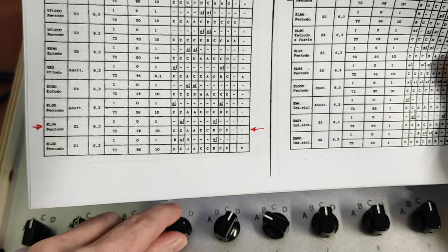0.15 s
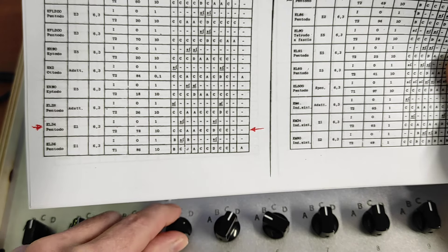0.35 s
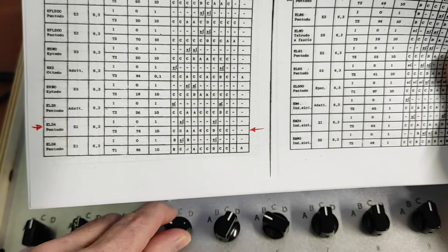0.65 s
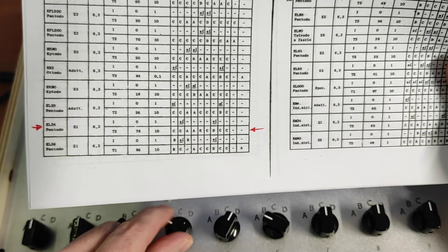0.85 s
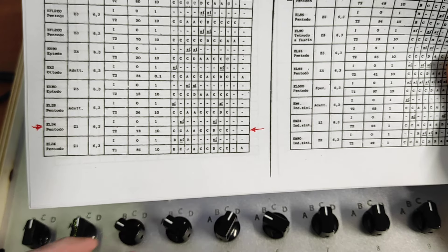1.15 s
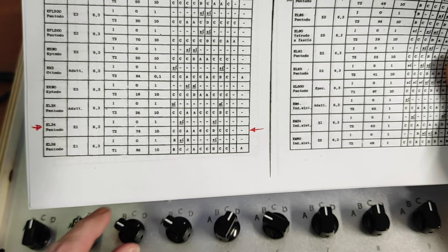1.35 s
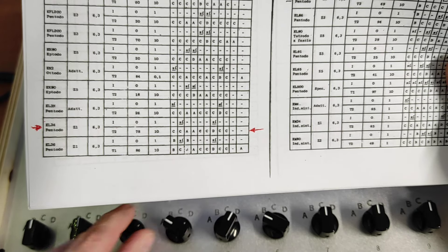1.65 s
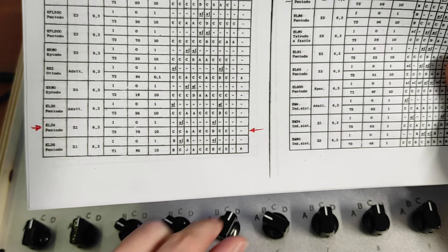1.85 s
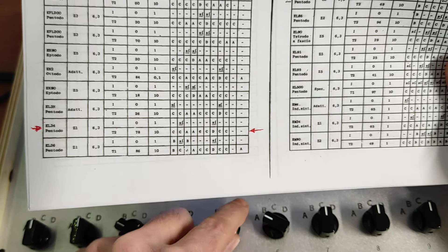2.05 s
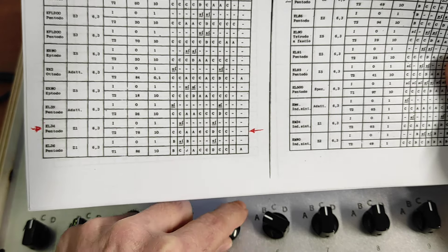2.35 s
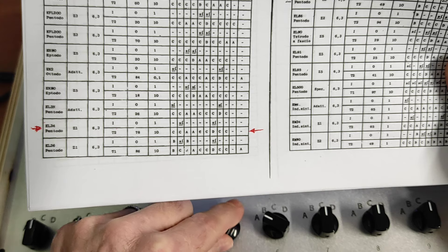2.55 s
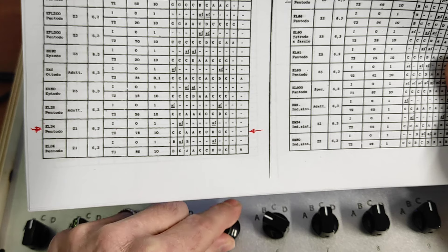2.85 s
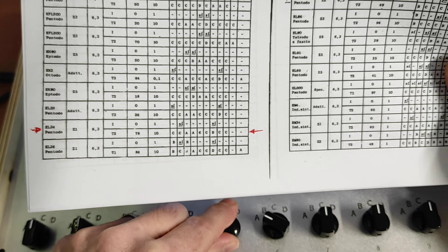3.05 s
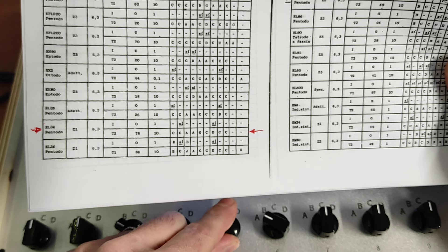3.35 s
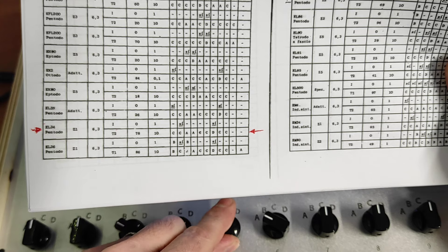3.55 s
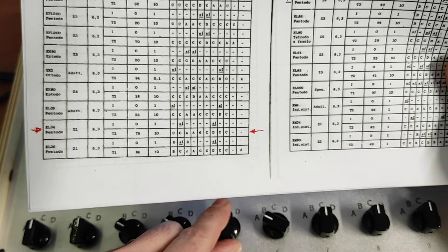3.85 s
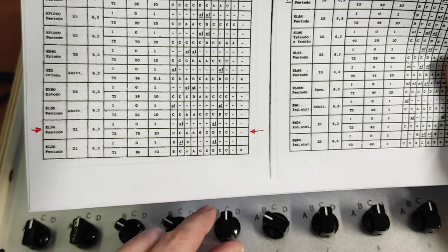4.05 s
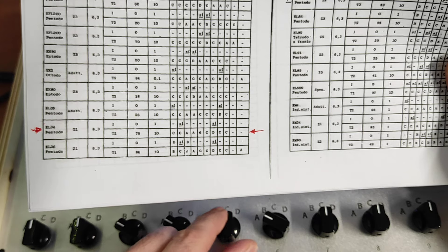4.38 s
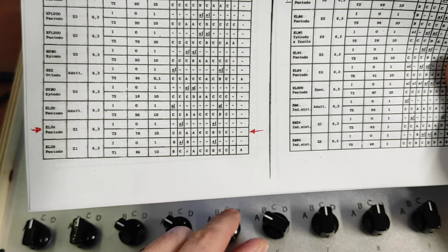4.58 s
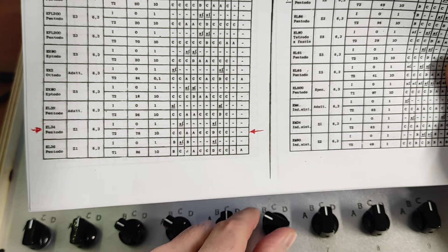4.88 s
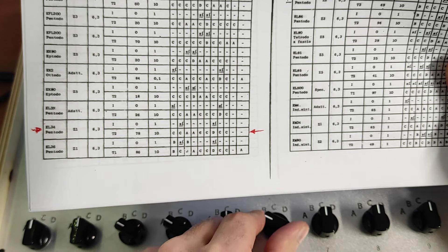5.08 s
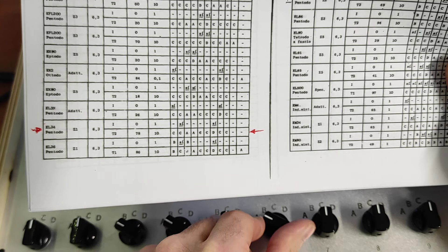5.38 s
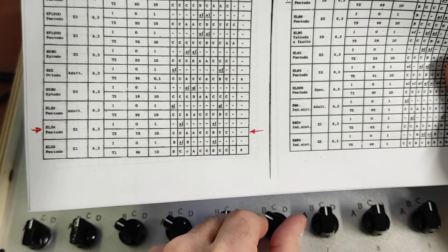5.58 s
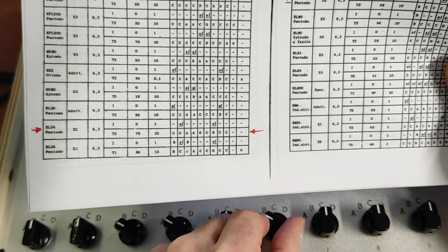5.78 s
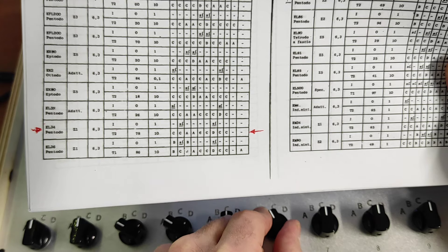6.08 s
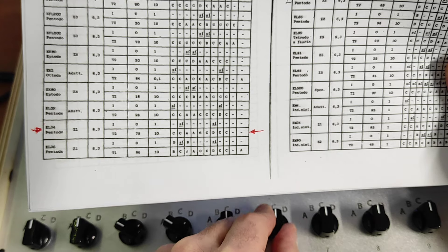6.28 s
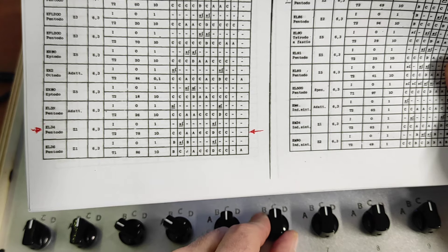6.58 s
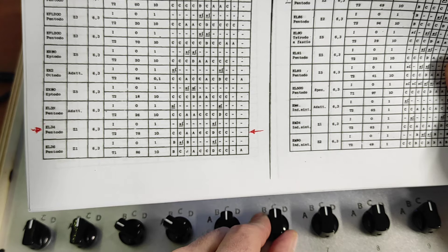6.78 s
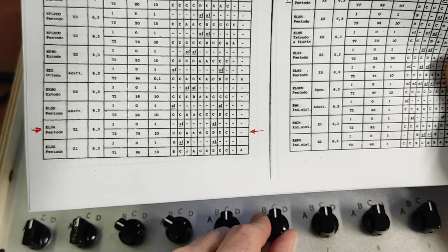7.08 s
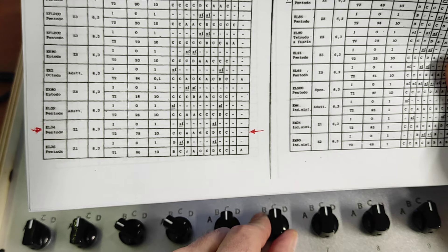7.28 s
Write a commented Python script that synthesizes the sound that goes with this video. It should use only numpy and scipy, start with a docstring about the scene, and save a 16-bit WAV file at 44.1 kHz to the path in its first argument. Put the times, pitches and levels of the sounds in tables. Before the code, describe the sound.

Close by, a hand turns rotary switches on a metal test device in a small quiet room. One bright, hard snap comes early, a much weaker rattly click midway, then two strong snaps near the end. Each has a tiny slip, spring rebounds, brief metallic ringing and a short room answer. Light fingertip taps fall between them. Distant traffic rumbles, with an engine drone swelling early and fading; faint hiss throughout.

```python
"""Far traffic rumbles and hisses behind a small quiet room, with one droning engine that swells early
and then draws away, all shaped from noise and slow gains, with a plain tone for the engine.
Close by, a hand turns rotary switches on a metal test set: each step slips, snaps and rattles in
bursts of noise, while decaying tones ring the spring and panel and the room answers.
Between the steps fingers tap the knobs lightly, as soft noise bursts; a faint hiss never stops."""
import sys
import numpy as np
from scipy import signal
from scipy.fft import rfft, irfft, next_fast_len
from scipy.io import wavfile
from scipy.ndimage import uniform_filter1d, minimum_filter1d, map_coordinates

SR = 44100
rng = np.random.default_rng(int(sys.argv[2]) if len(sys.argv) > 2 else 0)


def generate_wav(sig):
    """Save sig (samples, or channels by samples) to the path in sys.argv[1] as 16-bit PCM at SR."""
    pcm = np.round(np.clip(np.atleast_2d(sig).T, -1, 1) * 32767).astype(np.int16)
    wavfile.write(sys.argv[1], SR, pcm)


N = 327663
TOP_HZ = 15800  # the upper band limit

# Ways the front panel rings. Each row: pitch in Hz, relative level in dB, time to die by 60 dB in seconds.
PANEL = [(879, -4, 0.11), (1020, -1.5, 0.031), (1126, 5.5, .055), (1248, -3, 0.06)]
# The panel's strongest mode, which some steps drive far more than others. Each row: pitch in Hz,
# relative level in dB, time to die by 60 dB in seconds.
CENTRE_MODE = [(682, 1.5, 0.1)]


def amp(db):
    """Decibels to gain."""
    return 10 ** (np.asarray(db) / 20)


def unit(x):
    """x at rms 1."""
    return x / np.sqrt(np.mean(x ** 2) + 1e-20)


def along(points, hz):
    """(Hz, value) points read on a logarithmic frequency axis."""
    point_hz, value = np.transpose(points)
    return np.interp(np.log(hz + 1), np.log(point_hz + 1), value)


def wobble(rate, size=N):
    """A smooth random curve with this many random knots a second."""
    knots = rng.standard_normal(int(size * rate / SR) + 4)
    return map_coordinates(knots, [np.arange(size) * rate / SR])


def filtered(x, response):
    """x times a response of frequency, with spare silence so that the end does not wrap round."""
    n = x.shape[-1]
    m = next_fast_len(n + SR // 4)
    spectrum = rfft(x, m) * response(np.fft.rfftfreq(m, 1 / SR))
    return irfft(spectrum, m)[..., :n]


def sides(db):
    """Left and right gains for a left-minus-right level difference."""
    return amp(np.array([[.5], [-.5]]) * db)


def noise(spectrum, size):
    """Coloured stereo noise of rms 1, more alike on both sides in the bass than in the treble."""
    # Each row: frequency in Hz, likeness of left and right (1 is identical, 0 unrelated).
    alike = [(60, 0.54), (200, 1), (400, 0.4), (650, 0.28), (1200, 0.32), (2200, 0.11), (3000, 0.042)]

    def mid_and_side(hz):
        angle = np.arccos(np.clip(along(alike, hz), 0, 1)) / 2
        return amp(along(spectrum, hz)) * [np.cos(angle), np.sin(angle)]

    mid, side = filtered(rng.standard_normal((2, size)), mid_and_side)
    return unit(np.array([mid + side, mid - side]))


def fade(t, rise, t60):
    """A quick rise and an exponential decay from t = 0, both times in seconds."""
    t = np.maximum(t, 0)
    return (1 - np.exp(-t / rise)) * amp(-60 * t / t60)


def ring(modes, t, rise, scatter_db, phase_spread):
    """Damped tones, struck at new strengths and reaching each side in its own phase (radians)."""
    total = 0
    for hz, db, t60 in modes:
        strength = amp(db + scatter_db * rng.standard_normal())
        phase = phase_spread * rng.standard_normal((2, 1))
        total = total + strength * fade(t, rise, t60) * np.sin(2 * np.pi * hz * t + phase)
    return total


def add(track, s, sound):
    """Mix a sound into the track at time s, cut off at the track's end."""
    part = track[:, round(s * SR):][:, :sound.shape[1]]
    part += sound[:, :part.shape[1]]


def nearness(nearest_s, width_s):
    """Gain that swells and recedes as 1 / distance, as for a source going by on a straight line."""
    return 1 / np.hypot(1, (np.arange(N) / SR - nearest_s) / width_s)


def traffic():
    """Far traffic through the walls: swelling rumble, road noise and hiss, and one droning engine."""
    # Swells of low noise and hiss: vehicles going by, and at 3.5 s perhaps a finger rubbing.
    # Each row: time of the peak in seconds, swell on either side in seconds,
    # rumble in dB, road noise in dB, hiss in dB.
    swells = [(.45, 0.94, -61.5, -59.5, -69), (0.95, 0.09, -53.5, -57.5, -80.5),
              (1.15, 0.3, -58.5, -61, -73.5), (1.95, 0.19, -61.5, -75.5, -85), (2.9, .5, -66, -73, -72.5),
              (3.5, .15, -66, -67, -75), (4.45, 0.43, -70.5, -96, -73.5), (4.92, 0.25, -70.5, -62.5, -92),
              (5.33, 0.28, -77, -63.5, -86.5), (6.8, 0.99, -69, -69, -93.5)]
    # Colours of the three noises. Each row: frequency in Hz, relative level in dB per Hz.
    rumble_colour = [(15, -31), (26, -9), (35, 2.5), (42, -.5), (50, 2), (58, -11), (70, -14), (80, -20.5),
                     (105, -21), (190, -61)]
    road_colour = [(82, -29.5), (140, -0.5), (216, -3), (423, -13), (611, -13), (663, -11), (739, -16),
                   (950, -11.5), (1200, -19.5), (1560, -47), (2640, -120)]
    tyre_colour = [(500, -11.5), (850, 0), (1040, 5.5), (1250, 0.5), (1800, -0.5), (2600, -7.5),
                   (3400, -17), (5000, -22), (7500, -17.5), (9000, -24), (10500, -41.5), (15000, -47)]
    # Pitch of the drone. Each row: time in seconds, pitch in Hz.
    drone_pitch = [(0, 121.1), (.8, 121.7), (1.4, 125.2), (2, 129.9), (2.9, 134.2), (3.8, 134.3),
                   (4.7, 130)]
    # Balance of the traffic. Each row: frequency in Hz, left minus right in dB.
    lean = [(40, 2), (130, 6), (550, 4), (1650, 3), (5000, -3), (6500, -6), (8500, 1), (15000, 1)]
    far_rumble_db, far_road_db = -67.5, -73  # the traffic that is always there
    tyre_db, tyre_fade_db_per_s = -64, 2.5  # steady tyre hiss that draws away
    falloff = 1.8  # houses screen the road: the level falls as this power of distance
    engine_nearest_s, engine_width_s, engine_db = 0.52, 0.2, -55.5
    engine_start_s = 0.34  # the drone comes up from silence in this time
    hum_nearest_s, hum_width_s, hum_db = 2.6, 0.93, -71
    lead_s = .00043  # the left side hears the traffic this much earlier

    t = np.arange(N) / SR
    rumble_gain, road_gain = amp(far_rumble_db), amp(far_road_db)
    tyre_gain = amp(tyre_db - tyre_fade_db_per_s * t)
    for s, width_s, swell_rumble_db, swell_road_db, swell_hiss_db in swells:
        near = nearness(s, width_s) ** falloff
        # separate noises add by power
        rumble_gain = np.hypot(rumble_gain, amp(swell_rumble_db) * near)
        road_gain = np.hypot(road_gain, amp(swell_road_db) * near)
        tyre_gain = np.hypot(tyre_gain, amp(swell_hiss_db) * near)
    rumble = rumble_gain * amp(0.44 * wobble(12.0)) * noise(rumble_colour, N)
    road = road_gain * amp(1.4 * wobble(4.8)) * noise(road_colour, N)
    tyres = tyre_gain * amp(0.23 * wobble(6)) * noise(tyre_colour, N)

    pitch_hz = np.interp(t, *np.transpose(drone_pitch)) + .4 * wobble(32)
    phase = 2 * np.pi * np.cumsum(pitch_hz) / SR
    engine_swell = np.minimum(t / engine_start_s, 1) * nearness(engine_nearest_s, engine_width_s)
    drone = engine_swell * amp(engine_db + 0.96 * wobble(7.2)) * unit(np.sin(phase))
    # the exhaust hums an octave lower as the engine pulls away
    hum_swell = nearness(hum_nearest_s, hum_width_s)
    hum = hum_swell * amp(hum_db + 2 * wobble(8)) * unit(np.sin(phase / 2))

    # it comes from the left: earlier on that side, and louder there in the bass and middle
    lead = np.array([[.5], [-.5]]) * lead_s
    return filtered(rumble + road + tyres + drone + hum,
                    lambda hz: sides(along(lean, hz)) * np.exp(2j * np.pi * hz * lead))


def mechanism_colour(resonances, octaves, top_db):
    """The shared colour with one step's own broad resonances and brightness, as (Hz, dB) points."""
    # The colour all switch mechanisms share. Each row: frequency in Hz, relative level in dB per Hz.
    mechanism = [(820, -40), (1200, -21), (1550, -23), (2050, -18), (2500, -11.5), (3250, -13.5),
                 (3850, -16.5), (4700, -13), (6200, -11), (7100, -5), (8500, -2.5), (10500, -21.5),
                 (15500, -32)]
    hz = np.geomspace(mechanism[0][0], TOP_HZ, 200)
    peaks = sum(db * np.exp(-(np.log2(hz / centre) / octaves) ** 2) for centre, db in resonances)
    top = top_db / (1 + (9800 / hz) ** 20)  # acts above about 9800 Hz
    return np.column_stack([hz, along(mechanism, hz) + peaks + top])


def detent(t, colour, ring_db):
    """One blow of the detent on its notch: a crack and the short ring of the spring."""
    # The detent spring. Each row: pitch in Hz, relative level in dB, time to die by 60 dB in seconds.
    spring = [(2500, -32, .01), (3170, -32, 0.008), (5600, -14, 0.0018), (7250, -7.5, 0.0054),
              (7950, -2, 0.003), (8130, -6, .0042), (13500, -21, 0.0023)]
    crack = amp(-13.5) * fade(t, .0001, .003) * noise(colour, len(t))
    return crack + amp(ring_db) * ring(spring, t, rise=.00018, scatter_db=1.0, phase_spread=.35)


def bending(x, delay):
    """Bending waves in sheet metal travel as the root of frequency: the bass trails the 8 kHz snap."""
    return filtered(x, lambda hz: np.exp(-2j * np.pi * delay * (2 * np.sqrt(8000 * hz) - hz)))


def reverberation(sound):
    """The room's diffuse answer: noise in which each frequency dies at its own speed."""
    # How long the room rings. Each row: frequency in Hz, time to die by 60 dB in seconds.
    decay = [(150, 0.62), (700, 0.46), (2000, 0.41), (7000, .33), (10000, 0.29), (15000, 0.21)]
    # Colour of the answer. Each row: frequency in Hz, relative level in dB.
    room_colour = [(80, -22), (150, 3.5), (300, -3.5), (600, -4.5), (1500, -1.5), (3000, 1), (8000, 2.5),
                   (14000, 3)]
    bench_db, walls_s, echo_grain_db = -3, .019, 1.3

    hz, s, z = signal.stft(rng.standard_normal(sound.shape), SR, nperseg=512)
    z = z * amp(along(room_colour, hz)[:, None] - 60 * s / along(decay, hz)[:, None])
    tail = signal.istft(z, SR, nperseg=512)[1]
    t = np.arange(tail.shape[1]) / SR
    # the bench answers at once, the walls a little later
    bench = amp(bench_db) * np.clip(t / 0.0026, 0, 1)
    walls = np.clip((t - walls_s) / .003, 0, 1)
    tail = tail * np.maximum(bench, walls)
    tail = tail * amp(echo_grain_db * wobble(250, size=len(t)))  # uneven echoes
    tail = tail / np.linalg.norm(tail[0])
    return signal.fftconvolve(sound, tail, axes=1)[:, :sound.shape[1]]


def echoes(sound):
    """Distinct echoes from nearby hard surfaces, each reaching the two sides a little apart."""
    # Each row: delay in seconds, level in dB relative to the diffuse answer's full strength.
    surfaces = [(.0235, -15), (.0285, -16), (.0335, -16)]
    out = np.zeros_like(sound)
    for delay_s, db in surfaces:
        arrivals = delay_s + .0003 * rng.standard_normal((2, 1))
        out += amp(db) * filtered(sound, lambda hz: np.exp(-2j * np.pi * hz * arrivals))
    return out


def switches():
    """The detent slides off its crest, snaps home and rebounds; the shaft knocks panel and case."""
    # Switch steps. Each row: time in seconds, snap in dB, spring ring in dB, slip in dB, slip lead in seconds,
    # rattle in dB, rattle length in seconds, knock lag in seconds, centre mode in dB, side mode in dB,
    # panel in dB, panel edge in dB, chassis in dB, case thump in dB, room boom in dB, room answer in dB,
    # left minus right in dB, low resonance in Hz, its level in dB, high resonance in Hz, its level in dB,
    # half width of both in octaves, treble above about 9800 Hz in dB.
    steps = [(0.7489, 2, -1, -12, 0.0016, -13.5, 0.009, 0.00052, -29.5, -33, -30, -34.5, -61, -40, -52, -9, 0.5, 1480, 11.5, 2590, 6, .2, -1.5),
             (2.9985, -11, -17, -21, 0.0016, -22.5, 0.015, 0.00353, -59, -37, -44.5, -72, -42, -41.5, -56, -8, 0.5, 3000, 3.5, 5900, 4, 0.18, 1),
             (6.0041, 2.5, -4, -16.5, 0.0022, -19, 0.011, 0.00067, -35, -43.5, -36.5, -58, -49, -42, -42, -9.5, 0.5, 2550, 1, 7740, 3.5, 0.22, -6),
             (6.322, 4, -2.5, -15, 0.0019, -21, 0.01, 0.001445, -41.5, -35, -37, -63, -61.5, -38, -41.5, -9, 1.5, 1574, -4, 5300, 8.5, 0.33, 7)]
    # Spring rebounds. Each row: time in seconds, level in dB.
    rebounds = [(0.7506, -1.5), (0.7535, -7), (0.7568, -14), (3.0018, -11.5), (3.0101, -13.5),
                (6.0104, -17.5), (6.014, -13), (6.0147, -14), (6.327, -26), (6.328, -12.5)]
    # Ringing metal and room: a second strong mode, the panel's higher modes, the chassis, the room's boom.
    # Each row: pitch in Hz, relative level in dB, time to die by 60 dB in seconds.
    side_mode = [(807.3, 0, 0.063)]
    panel_edge = [(1227, -0.5, .08), (1467, -4.5, .09), (1543, -3, 0.11), (1767, -6, .08)]
    chassis = [(183, -4, 0.079), (253, -4.5, .32), (320, 2, 0.13)]
    room_modes = [(147, -2, 0.31), (162, -7, .3), (233.35, -5, 0.25)]
    # Colour of the case thump. Each row: frequency in Hz, relative level in dB per Hz.
    case_colour = [(60, -34.5), (130, -8.5), (240, -5), (380, -1.5), (520, -9.5), (900, -3), (1350, -12.5),
                   (1800, -18), (4000, -49)]
    rattle_rate, rattle_grain_db = 900, 3  # random knots a second and their scatter in strength

    out = np.zeros((2, N))
    t = np.arange(-SR // 100, SR // 2) / SR  # seconds from the snap
    for (s, snap_db, ring_db, slip_db, lead_s, rattle_db, rattle_s, lag_s, centre_db, side_db,
         panel_db, edge_db, chassis_db, case_db, boom_db, room_db, pan_db,
         low_hz, low_db, high_hz, high_db, octaves, top_db) in steps:
        colour = mechanism_colour([(low_hz, low_db), (high_hz, high_db)], octaves, top_db)
        slip = amp(slip_db) * fade(t + lead_s, 0.00086, 0.016) * noise(colour, len(t))

        # the snap, then every listed rebound within the next half second
        blows = [(s, snap_db)] + [(at, db) for at, db in rebounds if 0 < at - s < t[-1]]
        snap = sum(amp(db) * detent(t - (at - s), colour, ring_db) for at, db in blows)

        grain = amp(rattle_grain_db * wobble(rattle_rate, size=len(t)))
        contacts = unit(grain * noise(colour, len(t)))
        rattle_shape = np.clip(t / 0.0014, 0, 1) * np.exp(-(t / rattle_s) ** 2)
        rattle = amp(rattle_db) * rattle_shape * contacts

        # each step drives the modes of the metal in its own mix
        struck = t - lag_s
        parts = [(side_db, side_mode), (panel_db, PANEL), (edge_db, panel_edge), (chassis_db, chassis)]
        metal = sum(amp(db) * ring(modes, struck, rise=0.00071, scatter_db=1.5, phase_spread=0.13)
                    for db, modes in parts)
        centre = amp(centre_db) * ring(CENTRE_MODE, struck, rise=.003, scatter_db=1.5, phase_spread=0.13)
        case = amp(case_db) * fade(struck, 0.0004, 0.15) * noise(case_colour, len(t))

        click = bending(slip + snap + rattle + metal + centre + case, delay=.001)
        boom = amp(boom_db) * ring(room_modes, t - .008, rise=0.016, scatter_db=1.0, phase_spread=.3)
        answer = amp(room_db) * (reverberation(click) + echoes(click))
        add(out, s + t[0], sides(pan_db) * (click + boom + answer))
    return out


def fingers():
    """Fingertips knock dully on the knobs, which sound the panel and tick in their play."""
    # Light finger contacts. Each row: start in seconds, knock in dB, tick in dB.
    taps = [(0.969, -57.5, -58), (1.569, -72.5, -70), (1.726, -58.5, -65), (2.648, -66, -55.5),
            (5.46, -67.5, -87), (6.529, -58, -70)]
    # Colours of the dull knock and the tick. Each row: frequency in Hz, relative level in dB per Hz.
    knock_colour = [(100, -25), (250, 9), (700, 7), (1200, -4), (2200, -4), (8000, -47)]
    tick_colour = [(1500, -7), (3000, -8), (4000, -12), (5500, -6), (7500, -2.5), (9000, -6), (10500, -44),
                   (15000, -32)]

    out = np.zeros((2, N))
    t = np.arange(SR // 2) / SR
    for s, knock_db, tick_db in taps:
        panel = amp(-5) * ring(PANEL, t, rise=.002, scatter_db=1.5, phase_spread=0.24)
        centre = amp(-0.5) * ring(CENTRE_MODE, t, rise=0.0017, scatter_db=1.0, phase_spread=0.42)
        knock = amp(2) * fade(t, 0.00088, 0.093) * noise(knock_colour, len(t)) + panel + centre
        tick_shape = fade(t, 0.00065, 0.033) + amp(-19) * fade(t, 0.0086, 0.33)  # short, with a faint tail
        tick = tick_shape * noise(tick_colour, len(t))
        add(out, s, bending(amp(knock_db) * knock + amp(tick_db) * tick, delay=0.001047))
    return out


def causal(gain):
    """The response with this gain that rings only after a blow (minimum phase)."""
    cepstrum = irfft(np.log(gain))
    half = cepstrum.shape[-1] // 2
    # fold the part before time zero onto the part after it
    fold = np.r_[1, np.full(half - 1, 2), 1, np.zeros(half - 1)]
    return np.exp(rfft(cepstrum * fold))


def scene():
    """Switches and fingers over the traffic and a faint steady hiss."""
    # The two microphone ports resonate apart. Each row: frequency in Hz, left minus right in dB.
    ports = [(100, 3.5), (300, 2.5), (600, 3), (1200, 0), (3700, -3), (5200, -4), (6500, -8), (7400, -9),
             (8500, 6.5), (10000, 2.5), (12000, -2.5)]
    # Colour of the hiss. Each row: frequency in Hz, relative level in dB per Hz.
    hiss_colour = [(1000, 4), (3000, -2), (5000, -5.5), (7500, -0.5), (9000, -2.5), (10500, -22),
                   (15000, -20)]
    near = filtered(switches() + fingers(), lambda hz: causal(sides(along(ports, hz))))
    return near + traffic() + amp(-81.0) * noise(hiss_colour, N)


def record(dry):
    """The camera holds down the highest peaks, then cuts steeply above its band limit."""
    ceiling = .8  # of full scale, ahead of the cut
    needed = ceiling / np.maximum(np.abs(dry).max(axis=0), ceiling)
    # the gain dips smoothly around each peak
    gain = uniform_filter1d(minimum_filter1d(needed, size=33), size=33)
    return filtered(dry * gain, lambda hz: 1 / np.sqrt(1 + (hz / TOP_HZ) ** 120))


dry = scene()
out = record(dry)
generate_wav(out)
```